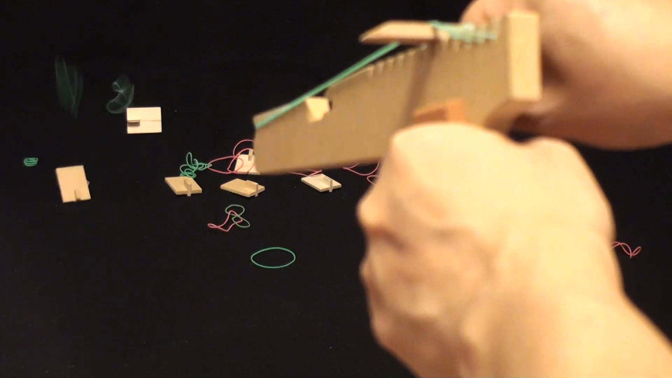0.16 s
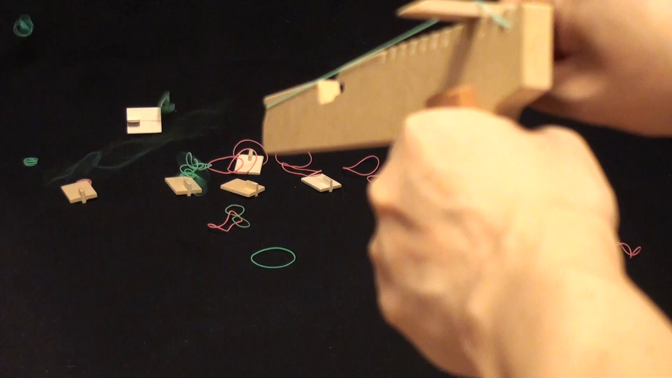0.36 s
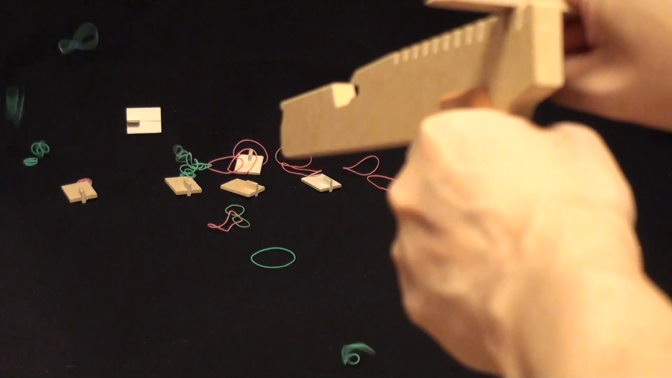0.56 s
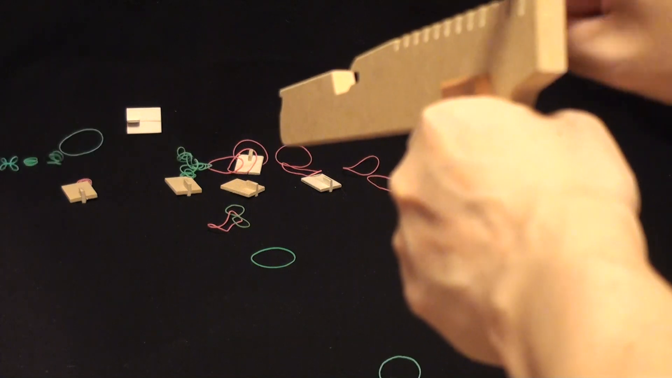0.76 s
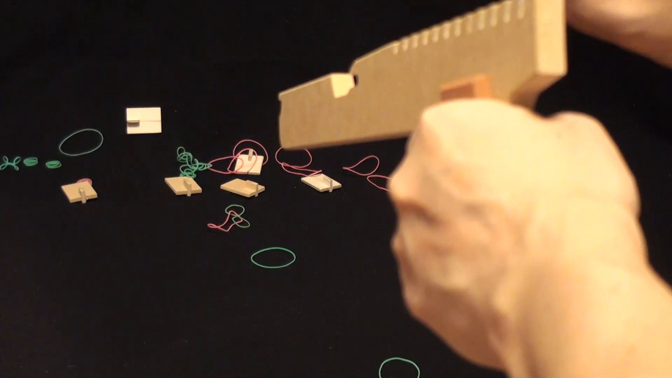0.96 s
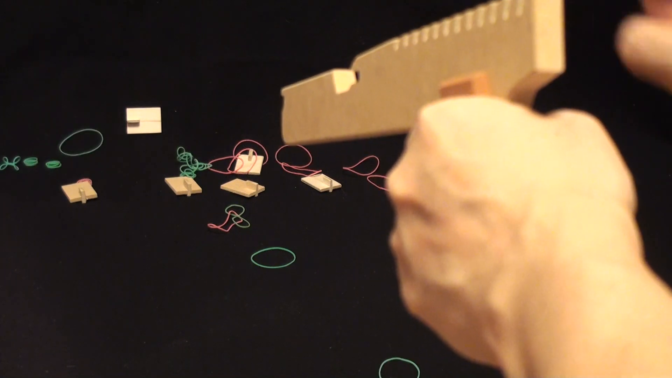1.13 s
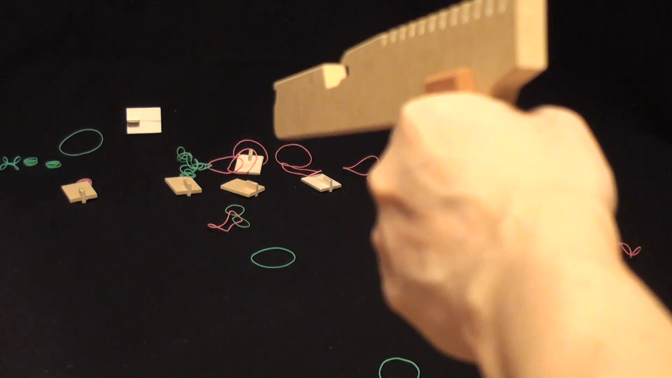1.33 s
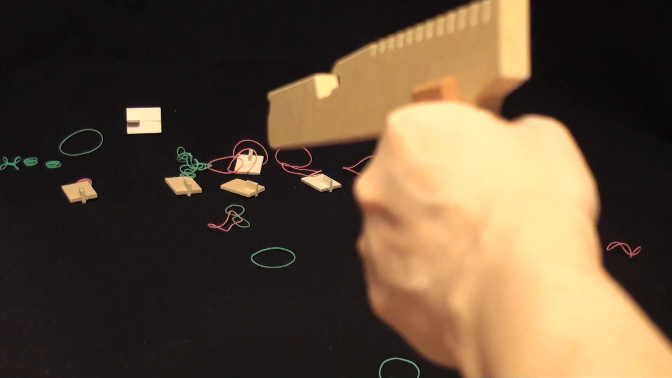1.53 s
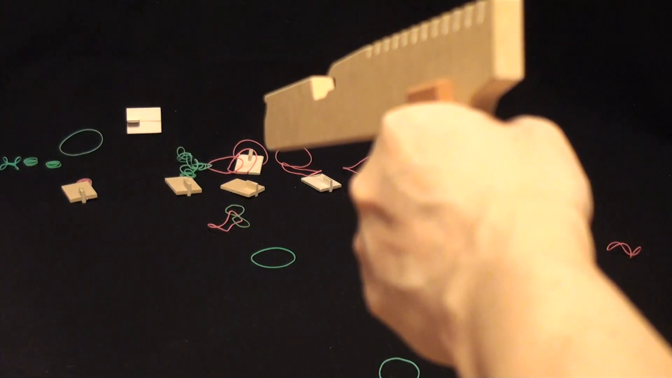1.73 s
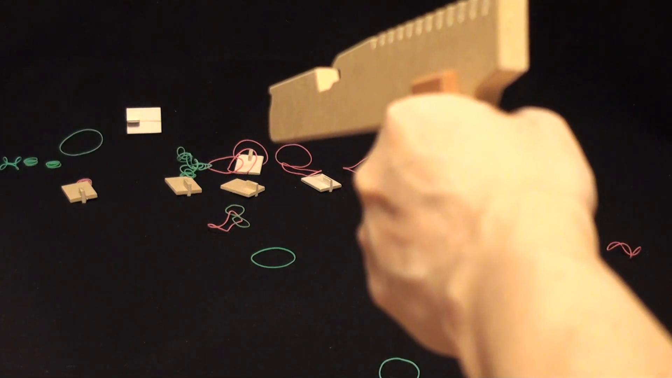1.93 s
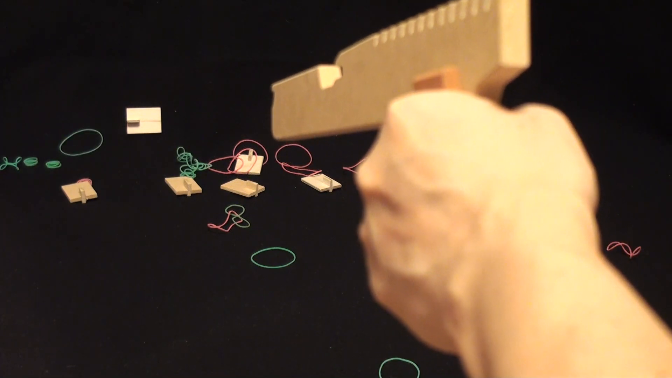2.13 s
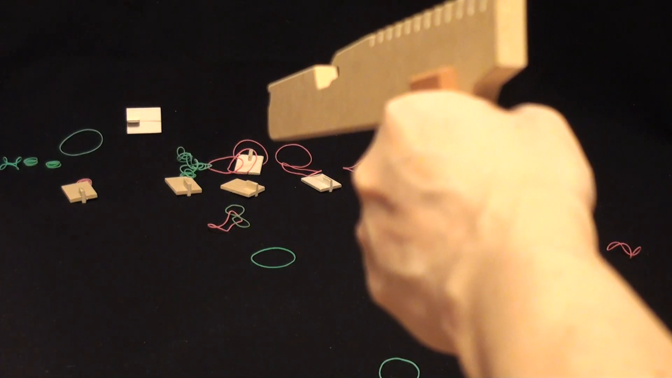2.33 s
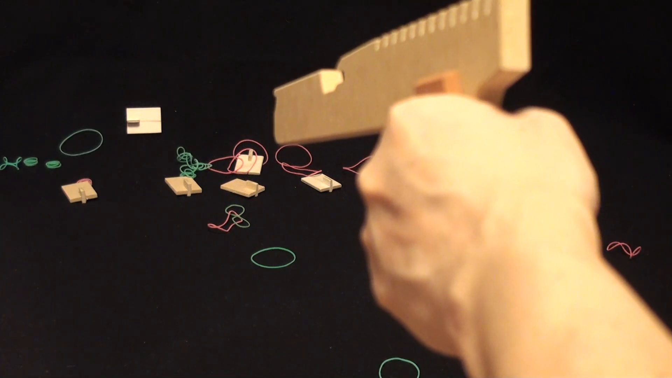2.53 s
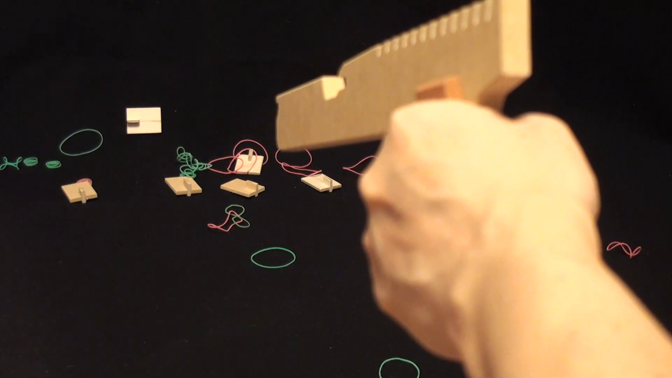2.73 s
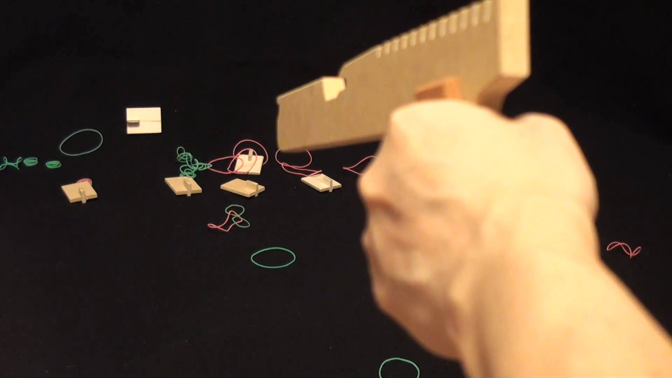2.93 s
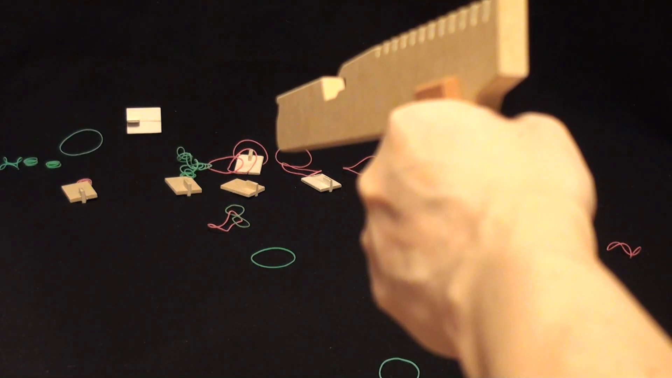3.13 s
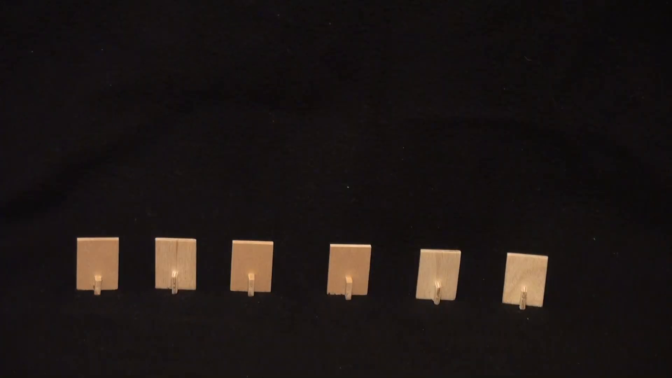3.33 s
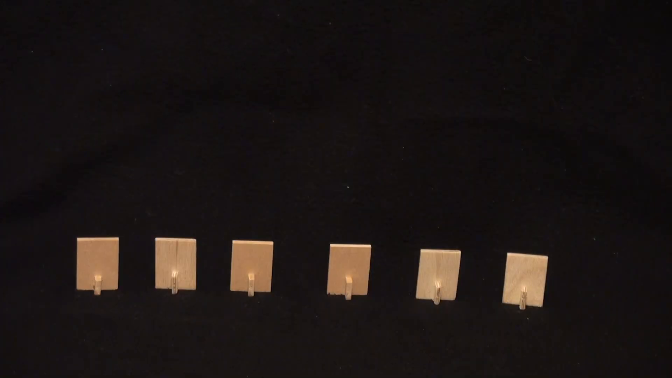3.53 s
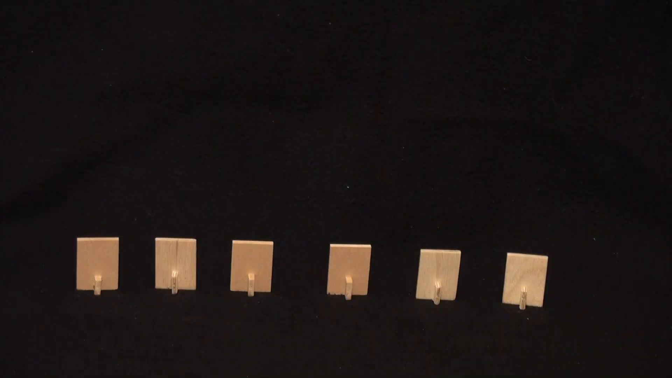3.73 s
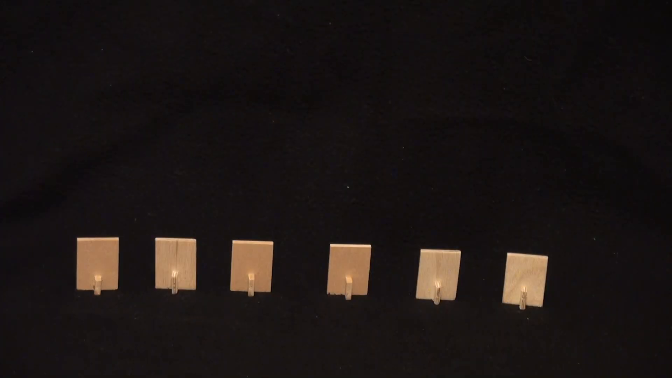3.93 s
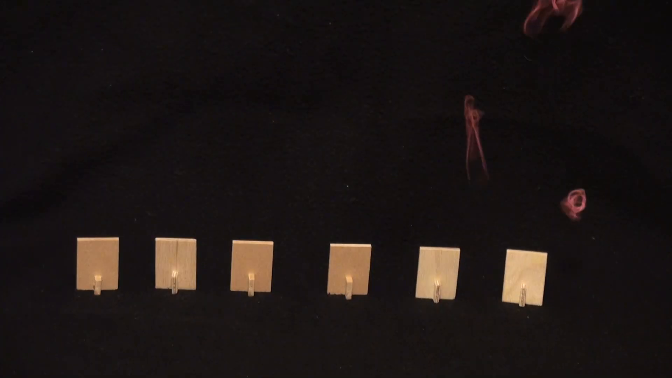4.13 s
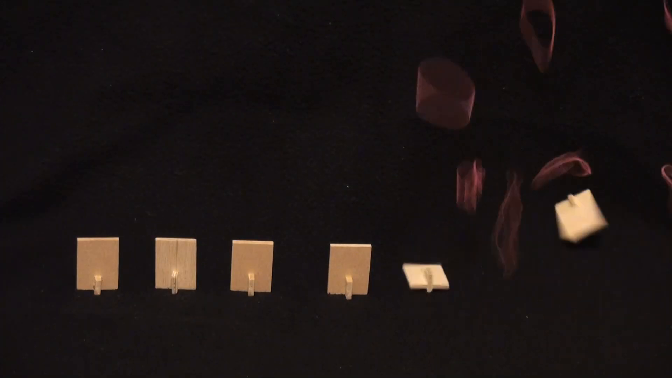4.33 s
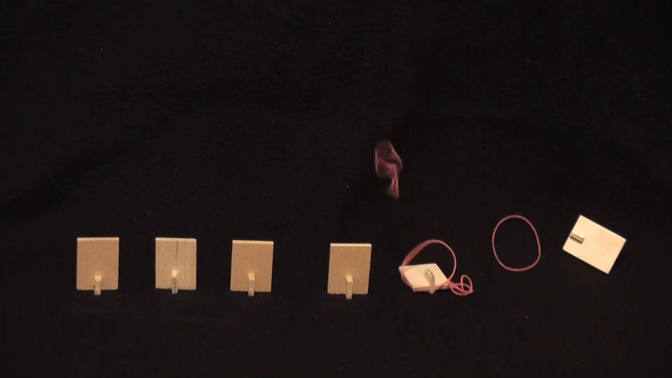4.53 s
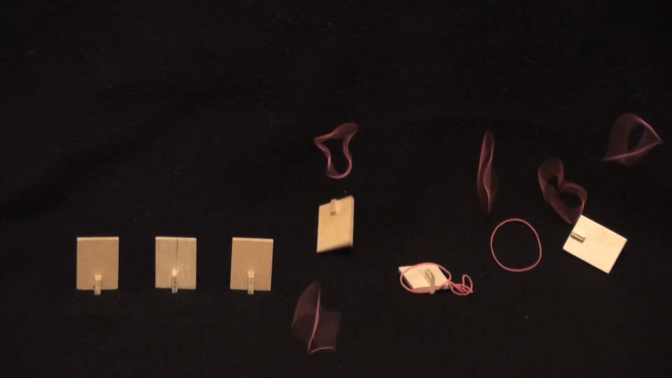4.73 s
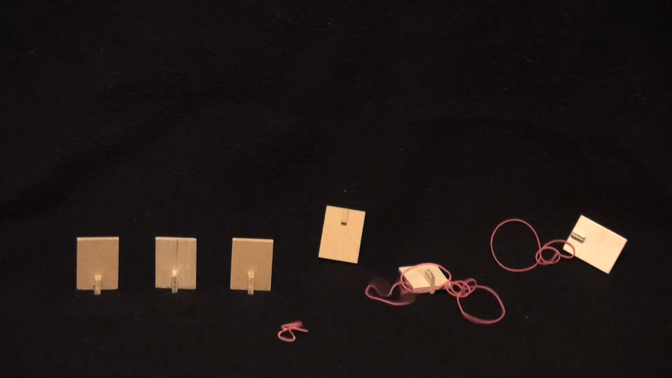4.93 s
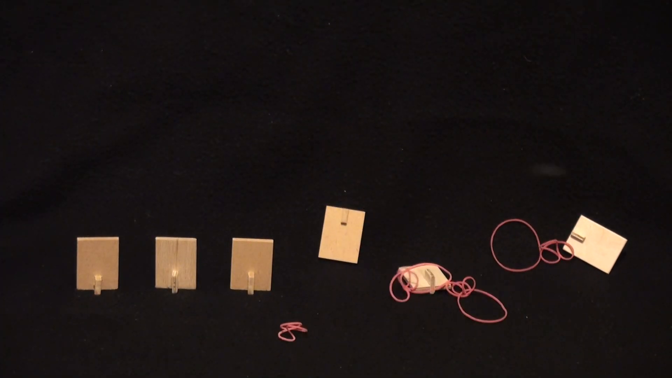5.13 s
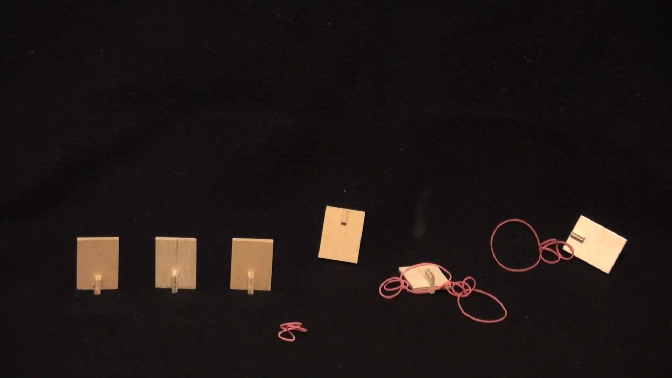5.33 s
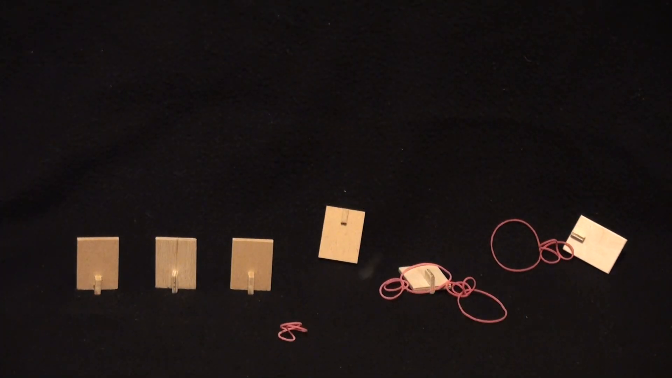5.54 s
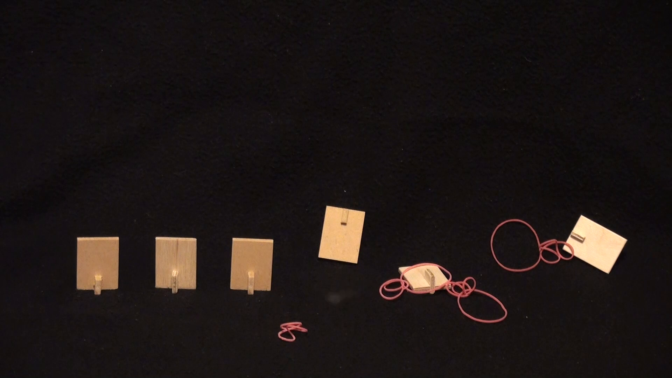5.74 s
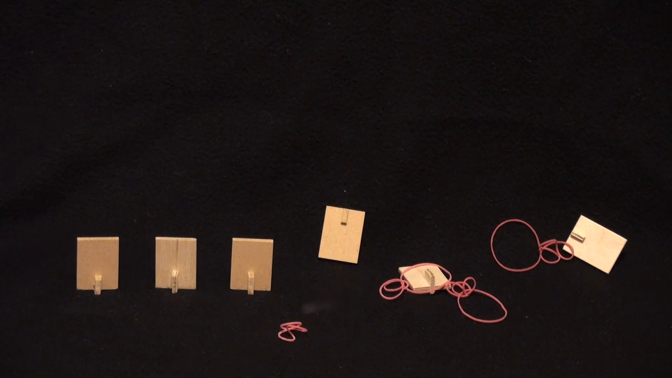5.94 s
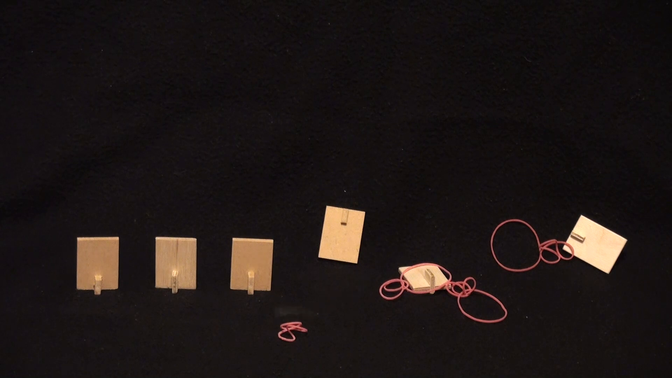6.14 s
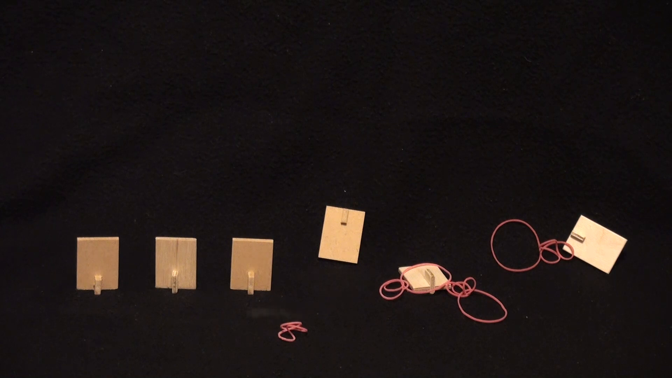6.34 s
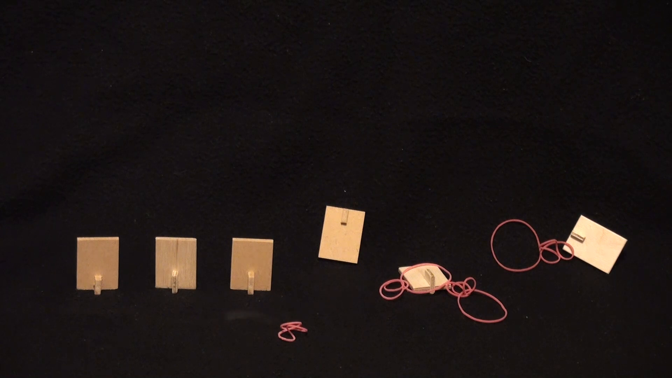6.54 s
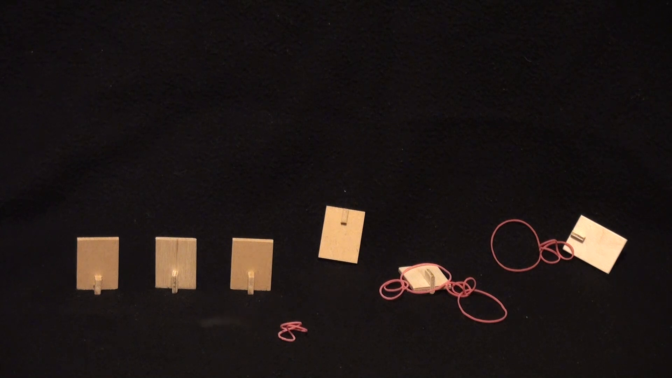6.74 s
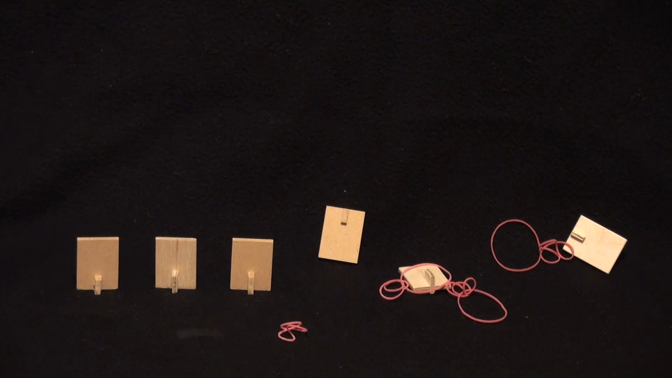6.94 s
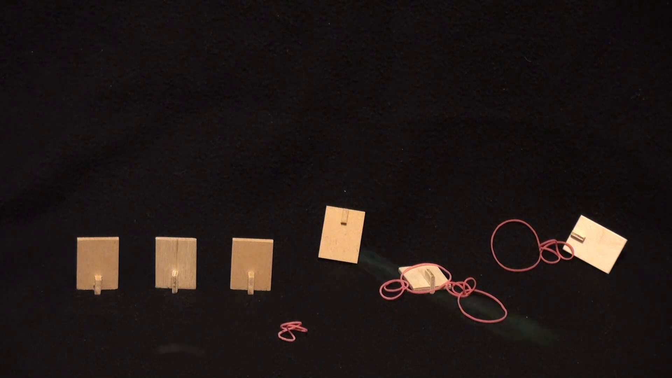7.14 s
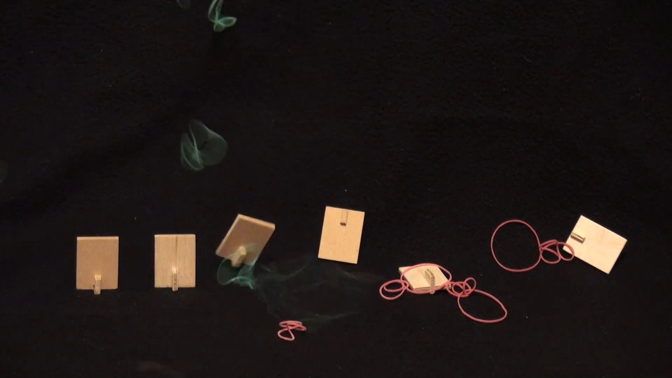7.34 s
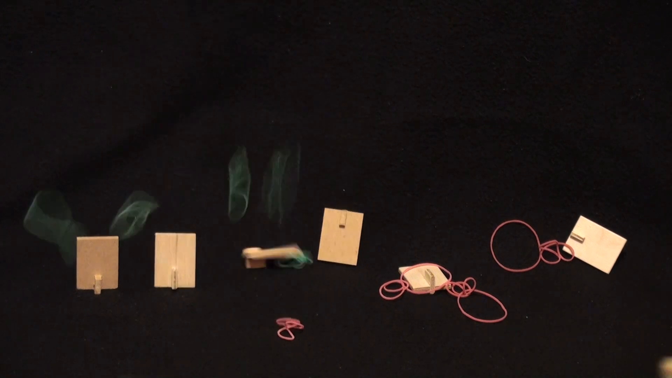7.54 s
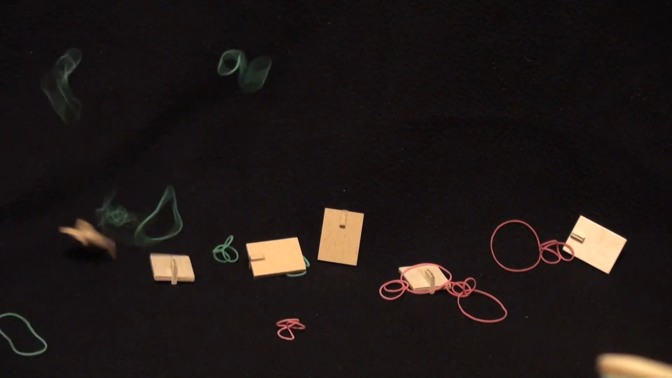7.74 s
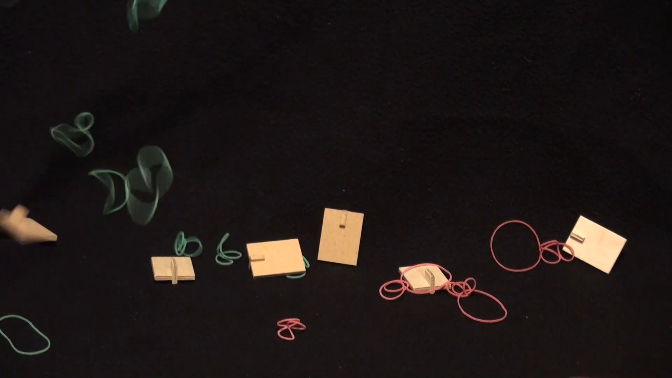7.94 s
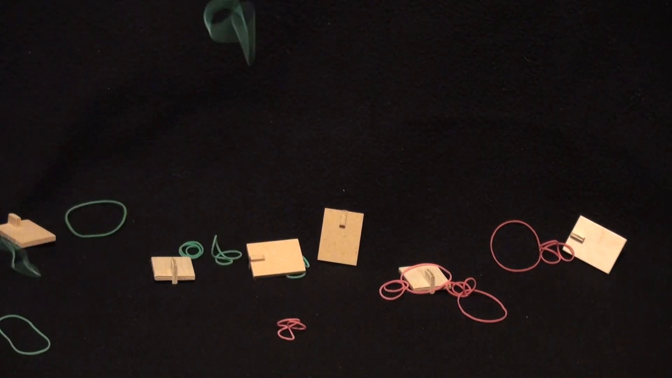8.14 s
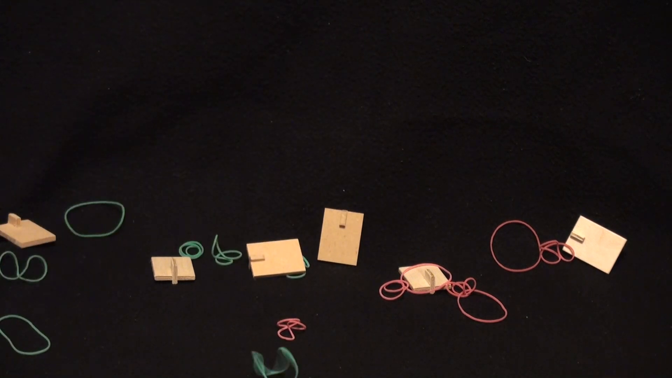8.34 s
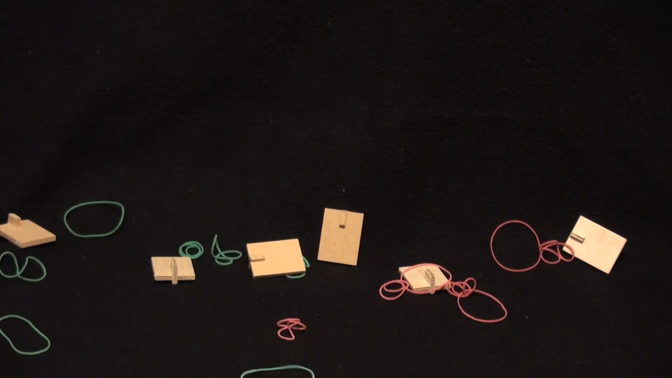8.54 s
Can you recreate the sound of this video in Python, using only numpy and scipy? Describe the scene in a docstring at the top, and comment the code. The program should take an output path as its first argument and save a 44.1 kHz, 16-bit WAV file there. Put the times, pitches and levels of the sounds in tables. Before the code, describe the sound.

A wooden rubber band gun is fired close by in a small, quiet room. From 0.1 to about 0.6 s a rapid volley of crisp wooden clicks, rubber snaps and short fluttering whirrs rattles out, ending with a light wood clack. Faint room air and low hum follow, with a tiny click near 1.3 s and almost inaudible rubbing. From 4.0 to 4.8 s comes a second burst: snaps, dull cloth knocks, a zip, thin rubber squeaks, and a strong thud and wood clack around 4.7 s. Quiet returns, with soft rubs and minute ticks near 6 s. From 7.1 to 8.1 s the third burst is densest and brightest, with knocks, rising zips and a final clatter of wood. Every sound leans right, then repeats 0.13 s later, louder and leaning left. Quiet air closes.

```python
"""Three quick bursts of snaps, clicks and whirrs: a wooden rubber band gun fires at small wooden targets.
Bands snap and flail as coloured noise and tiny slaps; wood clicks as very short bursts with a pitch.
They land with soft knocks on a cloth, clack on ringing wood or zip away as rising tones; slipping rubber pings.
Soft rubs fill the gaps, over room air and hum. A small room answers each event, and the whole sound
repeats once, about an eighth of a second later."""
import sys
import numpy as np
from scipy import signal
from scipy.fft import rfft, irfft, next_fast_len
from scipy.io import wavfile
from scipy.ndimage import map_coordinates

SR = 44100
rng = np.random.default_rng(int(sys.argv[2]) if len(sys.argv) > 2 else 0)


def write(x):
    x = np.atleast_2d(x).T
    wavfile.write(sys.argv[1], SR, np.round(np.clip(x, -1, 1) * 32767).astype(np.int16))


N = 378378
T = np.arange(SR // 4) / SR  # the time axis of one event (s)
TOP_HZ = 14600  # upper band limit

# bands leaving the gun: t/s, strength/dB, whirr tilt/(dB per octave), whirr resonance f/Hz
SHOT_EVENTS = [(0.103, -35, -1.6, 5600), (0.1534, -42.5, -5, 4800), (0.236, -35, 1, 5570),
               (0.301, -33.5, -0.5, 5700), (0.404, -33, -1.6, 4960), (0.464, -31.5, -1.1, 3850),
               (4.015, -38.5, -0.5, 3530), (4.0686, -35.5, 0.5, 4200), (4.121, -39.5, -2.5, 3630),
               (4.205, -37, -1, 4170), (4.243, -35, 2, 2700), (4.278, -33, -1.5, 5550),
               (4.355, -34.5, 3, 2900), (4.488, -32.5, -1.6, 6400), (4.603, -31, 5.5, 2700),
               (4.674, -29, -1, 3330), (7.184, -41, 2, 3660), (7.24, -42, -2, 6600),
               (7.2765, -44, -5, 3800), (7.331, -40, -1.5, 5950), (7.373, -35, 0, 6700),
               (7.462, -36, -0.5, 5660), (7.545, -37, 0, 3580), (7.71, -33.5, 20, 5140),
               (7.767, -31.5, 0, 5070), (7.846, -31.5, 2.5, 5100), (7.896, -31.5, 1, 2430)]
# bands hitting the cloth squarely: t/s, level/dB, knock f/Hz, ring of the backdrop level/dB
THUMP_EVENTS = [(4.1327, -21.5, 750, -6), (4.5199, -22.5, 390, -4), (4.7027, -14, 517, 3),
                (7.231, -26.5, 710, 1), (7.498, -18, 700, 2.5), (7.796, -19, 560, 4.5),
                (7.8773, -16.5, 680, 0.5)]
# wood struck hard enough to ring: t/s, level/dB, most strongly excited f/Hz, ring level/dB
CLACK_EVENTS = [(0.4903, -30, 2400, -4), (0.4993, -38, 2400, 0), (4.245, -40, 1200, 1),
                (4.3785, -38, 1230, 2), (4.3871, -35, 1130, 3), (4.7034, -22.5, 1950, -15),
                (4.753, -31.5, 2550, -16), (7.9268, -23.5, 1980, -10), (7.9425, -34, 1700, -7),
                (7.958, -38, 1540, -3)]
# bands glancing off with a rising zip: t/s, level/dB, starting f/Hz, rise/octaves
ZIP_EVENTS = [(4.147, -46, 920, .45), (7.325, -48, 1080, .3), (7.576, -40, 1030, .46),
              (7.962, -44, 1480, .5)]
# colour of a wooden click: f/Hz, relative level/dB
CLICK_COLOUR = [(100, -57), (400, -20.5), (1200, 2.5), (4500, 5.5), (8000, 5), (12000, 4.5), (15000, -14)]


def shots(snap_db=-1, whirr_db=-1.5, slaps_db=-5.5):
    """A band snaps off its tooth, then flails and slaps along the barrel until it is clear."""
    # colour of snap and whirr: f/Hz, relative level/dB
    whirr_colour = [(44, -40), (75, -11.5), (120, -5), (175, -5.5), (275, 2), (420, -4.5), (593, -5),
                    (1030, -5), (1430, -5), (1900, -1), (2650, -4), (3850, -3), (4200, -4), (4590, -2.5),
                    (6380, -2), (10800, -8.5), (12100, -7.5), (14400, -23.5)]
    out = np.zeros((2, N))
    flail = (1 - np.exp(-T / 0.026)) * fall(t60=0.064, hold=0.034)
    for s, db, tilt, hz in SHOT_EVENTS:
        snap = amp(snap_db) * burst(colour(whirr_colour, tilt=0.084), t60=0.11, hold=0.0031)
        hiss = gliding(noise(ringing(colour(whirr_colour, tilt), hz, boost_db=-6, share=0.2)))
        whirr = amp(whirr_db) * flutter(rate=1200, depth_db=1.0) * hiss
        whirr = whirr + amp(slaps_db) * slaps(hz)
        shot = snap + low_cut(flail * whirr, hz=69.5)
        add(out, s, in_room(amp(db) * shot, wet_db=-3.0, wall_db=-11.5))
    return out


def clicks(firm_db=-15, brightens=0.13):
    """Wood on wood: a crack of a few milliseconds with its own pitch, duller when soft."""
    # the rack, the trigger and loose wooden parts: t/s, level/dB, f/Hz
    click_events = [(0.1083, -33, 4640), (0.1277, -30.5, 3200), (0.1575, -28.5, 4860), (0.1795, -35, 3500),
                    (0.2243, -41, 6720), (0.2615, -29, 4000), (0.3025, -28, 3240), (0.409, -25, 5300),
                    (0.412, -28, 4600), (0.4655, -29, 3000), (0.4699, -27, 3870), (1.3187, -46.5, 4400),
                    (1.327, -52, 4600), (4.0170, -31, 4710), (4.0721, -28, 4310), (4.0907, -28, 4410),
                    (4.1205, -34, 2840), (4.132, -28.5, 5000), (4.1605, -27.5, 3660), (4.243, -28, 7500),
                    (4.3592, -28, 4100), (4.4929, -29.5, 6260), (4.6068, -29.5, 3840), (4.6794, -27, 3190),
                    (6.4555, -48.5, 4050), (7.1195, -46, 3300), (7.1404, -46, 4500), (7.1873, -25.5, 6340),
                    (7.2157, -29.5, 3650), (7.2387, -32, 5000), (7.2418, -29, 3050), (7.258, -34, 4500),
                    (7.2797, -26, 6500), (7.2828, -24.5, 7500), (7.3042, -23.5, 3810), (7.3346, -26, 3680),
                    (7.3752, -26, 3090), (7.4662, -26, 7890), (7.5076, -28, 5200), (7.5480, -24.5, 6700),
                    (7.5783, -29, 3670), (7.7125, -25.5, 5460), (7.7420, -23.5, 5260),
                    (7.7702, -22.5, 2900), (7.8475, -26, 5430), (7.9003, -20, 4600)]
    out = np.zeros((2, N))
    for s, db, hz in click_events:
        tilt = brightens * (db - firm_db)  # dB per octave; level at firm_db
        wood = ringing(colour(CLICK_COLOUR, tilt), hz, boost_db=4, share=0.3)
        click = tick(wood, t60=0.0057, hold=0.00098)
        add(out, s, in_room(amp(db) * click, wet_db=-1.0, wall_db=-11.5))
    return out


def thumps(reach_db=4, echo_db=-10, echo_s=0.00384):
    """The cloth gives way once and springs back: a tight knock, its echo off the table and ringing modes."""
    # modes of the backdrop: f/Hz, level/dB, t60/s
    cloth_modes = [(326, -16, .095), (550, -23, .11), (712, -18, .09), (980, -18, .085)]
    out = np.zeros((2, N))
    for s, db, knock_hz, ring_db in THUMP_EVENTS + landings():
        u = np.pi * (knock_hz * T - 2 / 3)  # the push peaks after two thirds of a cycle
        push = (1 - 2 * u ** 2) * np.exp(-u ** 2)
        echo = amp(echo_db) * np.interp(T - echo_s, T, push, left=0)
        tone = amp(ring_db) * ring(struck(cloth_modes, knock_hz, reach_db), width_hz=4.3)
        knock = low_cut(push + echo + tone, knock_hz * 0.47)
        add(out, s, in_room(amp(db) * knock, wet_db=-8, wall_db=-25))
    return out


def landings(flight_s=0.026, level_db=-2.5, knock_hz=480, ring_db=-10):
    """Bands that hit nothing squarely drop softly into the cloth after their flight, listed like thumps."""
    other_hits = np.array([hit[0] for hit in THUMP_EVENTS + CLACK_EVENTS + ZIP_EVENTS])
    drops = []
    for s, db, *_ in SHOT_EVENTS:
        landing_s = s + flight_s
        if abs(other_hits - landing_s).min() > flight_s / 2:
            drops.append((landing_s, db + level_db, knock_hz * np.exp(rng.normal(0, 0.2)), ring_db))
    return drops


def clacks(reach_db=85):
    """A wooden target chatters and rings briefly; where it is struck decides which modes sound."""
    # modes of the small wooden targets: f/Hz, level/dB, t60/s
    wood_modes = [(1040, -4, .15), (1204, -1, .14), (1290, -4, .1), (1556, -6, .12), (1700, -1, .12),
                  (1814, -1, .11), (1915, -3, .09), (2105, -4, .09), (2345, 2.5, .14), (2410, -2, .08),
                  (2620, -5, .06), (3120, 1, .06), (3570, 7, .05)]
    out = np.zeros((2, N))
    for s, db, hz, ring_db in CLACK_EVENTS:
        body = resonance(hz, hz * 0.28)
        chatter = tick(lambda f: body(f) ** 2, t60=0.011, hold=0.0016)
        tone = ring(struck(wood_modes, hz, reach_db), width_hz=6)
        tone = amp(ring_db) * low_cut(tone, hz / 2)
        add(out, s, in_room(amp(db) * (tone + chatter), wet_db=-8.0, wall_db=-25))
    return out


def zips(rise_s=0.0018, bend_s=0.015):
    """A band glances off and zips away: a rough tone that rises and levels off."""
    out = np.zeros((2, N))
    shape = (1 - np.exp(-T / rise_s)) * fall(t60=0.045, hold=0.028)
    for s, db, hz, octaves in ZIP_EVENTS:
        pitch_hz = hz * 2 ** (octaves * (1 - np.exp(-T / bend_s)))
        tone = squeal(pitch_hz, width_hz=47)
        add(out, s, in_room(amp(db) * shape * tone, wet_db=-7.5, wall_db=-16))
    return out


def pings(click_db=-8):
    """A slip of taut rubber: a narrow, mostly very short squeak on a click."""
    # taut rubber slipping: t/s, level/dB, f/Hz, t60/s
    ping_events = [(0.2615, -28.5, 10550, 0.012), (4.2798, -20, 10900, .008), (4.286, -23.5, 10600, .009),
                   (4.2898, -23.5, 11000, .012), (4.3155, -24, 11800, .012), (4.627, -36, 12120, 0.14),
                   (7.7418, -27, 10200, .008), (6.1572, -26, 7750, .004)]
    out = np.zeros((2, N))
    for s, db, hz, t60 in ping_events:
        squeak = fall(t60, hold=0.00076) * squeal(hz, width_hz=390)
        click = amp(click_db) * tick(colour(CLICK_COLOUR, tilt=2.7), t60=0.0069, hold=0.0029)
        ping = low_cut(squeak + click, hz=700)
        add(out, s, in_room(amp(db) * ping, wet_db=-3, wall_db=-5))
    return out


def rubs(swell_s=0.025, catch_db=-6, catch_hz=3800):
    """Rubber drags over wood in soft swells, catches in tiny ticks and squeaks thinly."""
    # a stretched band rubbing along the wood: t of the peak/s, level/dB, squeak f/Hz, squeak over rub/dB
    rub_events = [(1.641, -68.5, 2280, -15), (3.993, -57, 2290, -8), (5.945, -59.5, 2267, 1),
                  (6.394, -64, 2270, -8), (7.147, -54.5, 2240, -20), (8.074, -62, 2300, -10)]
    # colour of the drag: f/Hz, relative level/dB
    rub_colour = [(300, -63), (2000, 3), (3000, 8), (3600, 9), (4500, 12.5), (5500, 11), (8000, 9.5),
                  (14000, -3)]
    # the first three harmonics of a squeak: level/dB
    harmonic_levels = [-15, -12, -1]
    out = np.zeros((2, N))
    middle = T.mean()
    swell = signal.windows.tukey(len(T)) / np.cosh((T - middle) / swell_s)
    for s, db, hz, squeak_db in rub_events:
        squeak = sum(amp(level) * squeal(k * hz, width_hz=97) for k, level in enumerate(harmonic_levels, 1))
        # catches gather around the peak of the swell
        catches = np.roll(slaps(catch_hz, span_s=middle, count=5), len(T) // 4)
        drag = noise(colour(rub_colour)) + amp(squeak_db) * squeak + amp(catch_db) * catches
        add(out, s - middle, in_room(amp(db) * swell * drag, wet_db=-7.0, wall_db=-27))
    return out


def background(air_db=-67.0, hum_db=-5):
    """Room air as wide coloured noise, with the hum and whine of an appliance as wavering sines."""
    # colour of the air: f/Hz, relative level/dB
    air_colour = [(8, -38), (25, 1), (50, -9), (85, 2), (115, -2), (170, -4), (300, -4), (550, -6.5),
                  (1200, -5.5), (2500, -11), (6300, -17), (11000, -18.5), (12600, -13), (13400, -53),
                  (20000, -100)]
    # slow drift of the air: t/s, level over air_db/dB
    air_drift = [(0, 0), (1.7, .5), (2.3, -1.2), (3.7, -1.8), (5.2, .5), (8.58, .3)]
    # lines of the appliance: f/Hz, level before the hum_db trim/dB
    hum_lines = [(119, -71.5), (840, -76), (1260, -77)]
    t = np.arange(N) / SR
    mid, side = noise(colour(air_colour), size=N), noise(colour(air_colour), size=N)
    drift_db = np.interp(t, *np.transpose(air_drift))
    air = amp(air_db + drift_db) * np.array([mid + side, mid - side])
    hum = np.zeros(N)
    for hz, db in hum_lines:
        waver = 0.5 * noise(lambda f: np.exp(-f / 2), size=N)  # slow phase wander (rad)
        hum += amp(db + hum_db) * np.sin(2 * np.pi * hz * t + waver)
    return (air + hum) * amp([[-0.6], [0.6]])  # leans slightly right


def in_room(x, wet_db, wall_db, wall_s=0.01154, wall_width_s=0.0021):
    """Direct sound, a cluster of wall echoes and a short tail, drawn anew for every event."""
    # decay of the tail: f/Hz, t60/s
    room_decay = [(100, 0.4), (400, 0.14), (1500, 0.24), (5000, 0.21), (13000, 0.2)]
    # width of the room sound: f/Hz, side share
    room_spread = [(100, 0.58), (300, 0.16), (600, 0.59), (2000, 0.51), (5000, 0.53), (8500, 0.71),
                   (12500, 0.45)]
    hz, t, z = signal.stft(rng.standard_normal((2, len(T))), SR, nperseg=256)
    decay = amp(-60 * t / along(room_decay, hz)[:, None])
    tail = signal.istft(z * decay, SR, nperseg=256)[1][:, :len(T)]
    tail *= 1 - np.exp(-T / 0.0003)
    walls = rng.standard_normal(tail.shape) * np.exp(-((T - wall_s) / wall_width_s) ** 2)
    tail = amp(wet_db) * tail / np.linalg.norm(tail[0])
    walls = amp(wall_db) * walls / np.linalg.norm(walls[0])
    mid, side = tail + walls
    side = irfft(rfft(side) * along(room_spread, np.fft.rfftfreq(len(T), 1 / SR)), len(T))
    answer = np.array([mid + side, mid - side])
    answer[:, 0] += 1  # direct sound
    return signal.fftconvolve(x[None], answer, axes=1)


def burst(gain, t60, hold, low_cut_hz=85):
    """A crack of coloured noise without deep bass, with the energy of its envelope."""
    shape = fall(t60, hold)
    crack = low_cut(shape * noise(gain), low_cut_hz)
    return crack * np.linalg.norm(shape) / np.linalg.norm(crack)


def tick(gain, t60, hold):
    """A burst so short that it is evened out to follow its spectrum without holes."""
    phase = np.angle(rfft(burst(gain, t60, hold)))
    spectrum = gain(np.fft.rfftfreq(len(T), 1 / SR)) * np.exp(1j * phase)
    even = irfft(spectrum, len(T)) * fall(2 * t60, 2 * hold)
    return even * np.linalg.norm(fall(t60, hold)) / np.linalg.norm(even)


def slaps(centre_hz, span_s=0.07, scatter=0.33, cycles=12, uneven_db=5, count=9):
    """Separate tiny slaps of rubber on wood, each with its own pitch and size; rms 1 over their span."""
    out = np.zeros(len(T))
    t = T[:SR // 100]
    for _ in range(count):
        hz = min(centre_hz * np.exp(scatter * rng.normal()), TOP_HZ)
        size = amp(uneven_db * min(rng.exponential(), 2))
        slap = fall(cycles / hz)[:len(t)] * np.cos(2 * np.pi * hz * t)
        add(out, rng.uniform(0, span_s), size * slap)
    return out * np.sqrt(span_s * SR) / np.linalg.norm(out)


def flutter(rate, depth_db):
    """The uneven strength of flailing rubber: random levels joined at a rate per second, rms 1."""
    knots = rng.standard_normal(len(T))
    return unit(amp(depth_db * map_coordinates(knots, [T * rate], order=1)))


def gliding(x, depth_db=2.7, per_octave=12, octaves_per_s=5):
    """Uneven resonances that slide together as the band changes shape; rms 1."""
    hz, t, z = signal.stft(x, SR, nperseg=512)
    octave = np.log2(hz + 1)[:, None] + rng.normal(0, octaves_per_s) * t
    peaks = map_coordinates(rng.standard_normal(len(hz)), [octave * per_octave], mode="mirror")
    return unit(signal.istft(z * amp(depth_db * peaks), SR, nperseg=512)[1][:len(x)])


def squeal(hz, width_hz):
    """A rough tone of rms 1: its phase wanders, which widens the line."""
    wander = np.sqrt(2 * np.pi * width_hz / SR) * rng.standard_normal(len(T))
    return np.sqrt(2) * np.sin(np.cumsum(2 * np.pi * hz / SR + wander))


def struck(modes, centre_hz, reach_db):
    """A blow favours the modes near one pitch; those an octave away are reach_db weaker."""
    return [(hz, db - reach_db * np.log2(hz / centre_hz) ** 2, t60) for hz, db, t60 in modes]


def ring(modes, width_hz):
    """Struck modes at slightly new strengths for every blow; rattling widens their lines."""
    out = np.zeros(len(T))
    for hz, db, t60 in modes:
        wander = np.sqrt(2 * np.pi * width_hz / SR) * np.cumsum(rng.standard_normal(len(T)))
        out += amp(db + rng.normal()) * fall(t60) * np.sin(2 * np.pi * hz * T + wander)
    return out


def fall(t60, hold=0):
    """Steady for hold seconds, then dying away by 60 dB in t60 seconds."""
    return 10 ** (-3 * np.maximum(T - hold, 0) / t60)


def noise(gain, size=len(T)):
    """Noise of rms 1, shaped by a gain that depends on frequency."""
    m = next_fast_len(size)
    spectrum = rfft(rng.standard_normal(m)) * gain(np.fft.rfftfreq(m, 1 / SR))
    return unit(irfft(spectrum, m)[:size])


def colour(spectrum, tilt=0):
    """The gain of a spectrum, tilted in dB per octave."""
    return lambda hz: amp(along(spectrum, hz) + tilt * np.log2(hz + 100))


def resonance(centre_hz, width_hz):
    """The gain of one resonance."""
    return lambda hz: abs(hz * width_hz / (centre_hz ** 2 - hz ** 2 + 1j * hz * width_hz))


def ringing(gain, hz, boost_db, share):
    """A colour with one resonance on top, as wide as a share of its pitch."""
    return lambda f: gain(f) * (1 + amp(boost_db) * resonance(hz, share * hz)(f) ** 2)


def low_cut(x, hz):
    """A high-pass: small things radiate little bass."""
    return signal.sosfilt(signal.butter(2, hz, "highpass", fs=SR, output="sos"), x)


def along(points, hz):
    """Read (Hz, value) points on a log frequency axis."""
    f, v = np.transpose(points)
    return np.interp(np.log(hz + 1), np.log(f + 1), v)


def amp(db):
    """Decibels to amplitude."""
    return 10 ** (np.asarray(db) / 20)


def unit(x):
    """Scale to rms 1."""
    return x / np.sqrt(np.mean(x ** 2) + 1e-20)


def add(track, s, sound):
    """Mix a sound into the track at s seconds."""
    start = max(round(s * SR), 0)
    track[..., start:start + sound.shape[-1]] += sound[..., :N - start]


def scene():
    """The gun, its bands and their landings over the quiet room."""
    return shots() + clicks() + thumps() + clacks() + zips() + pings() + rubs() + background()


def record(dry, repeat_s=0.13346, first_db=(-1.7, 1.2), repeat_db=(4.8, 0.7)):
    """The sound comes twice, first leaning right, then louder and leaning left, under a steep band limit."""
    # the quiet end wraps round, so the air is steady from the start
    late = np.roll(dry, round(repeat_s * SR), axis=1)
    both = dry * amp(first_db)[:, None] + late * amp(repeat_db)[:, None]  # levels are (left, right)
    m = next_fast_len(N + 8192)
    hz = np.fft.rfftfreq(m, 1 / SR)
    band_limit = 1 / np.sqrt(1 + (hz / TOP_HZ) ** 200)
    return irfft(rfft(both, m) * band_limit, m)[:, :N]


dry = scene()
out = record(dry)
write(out)
```